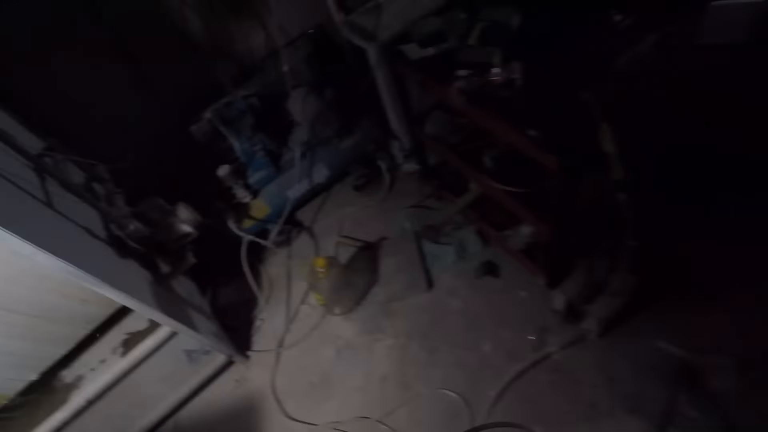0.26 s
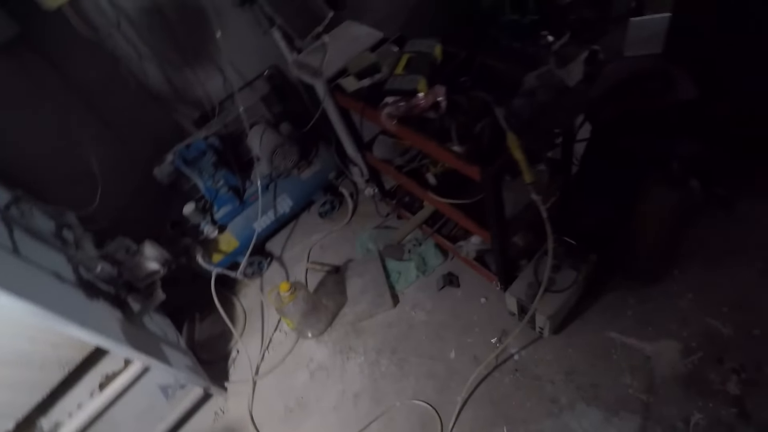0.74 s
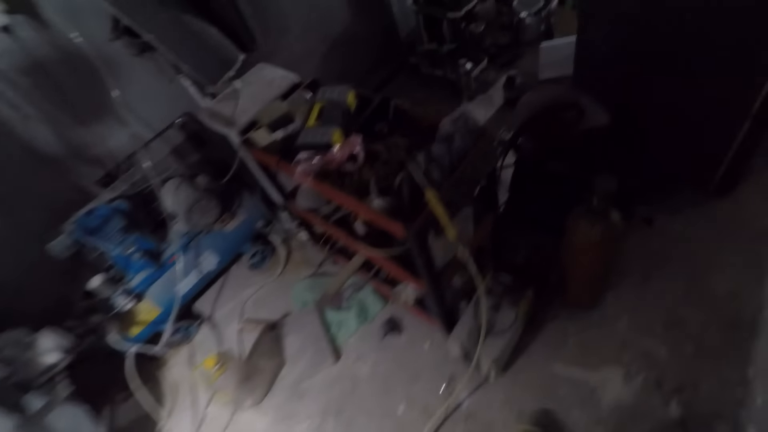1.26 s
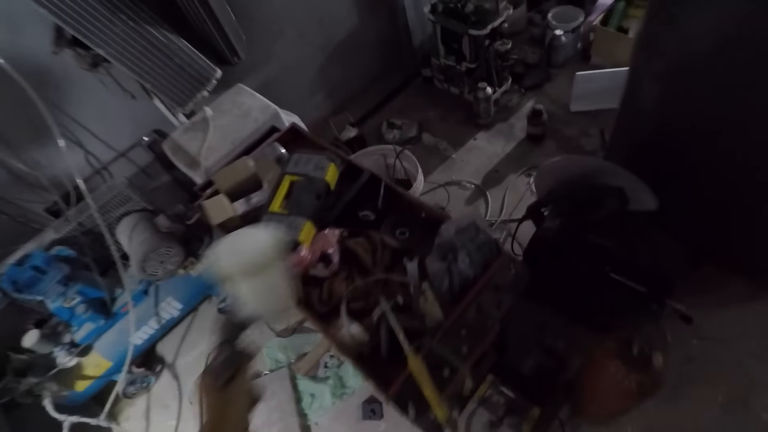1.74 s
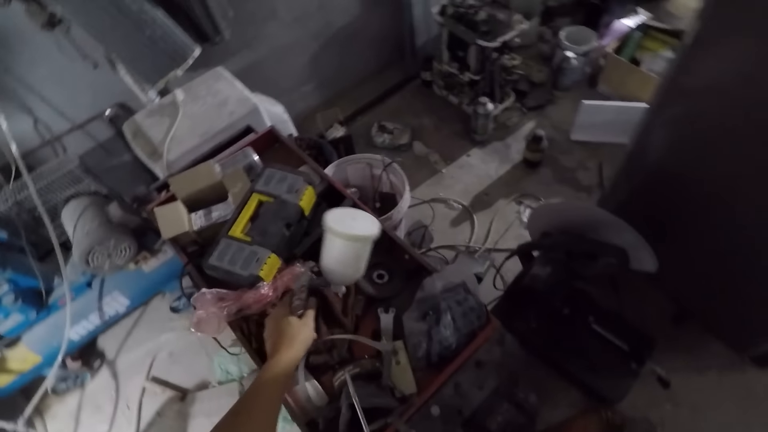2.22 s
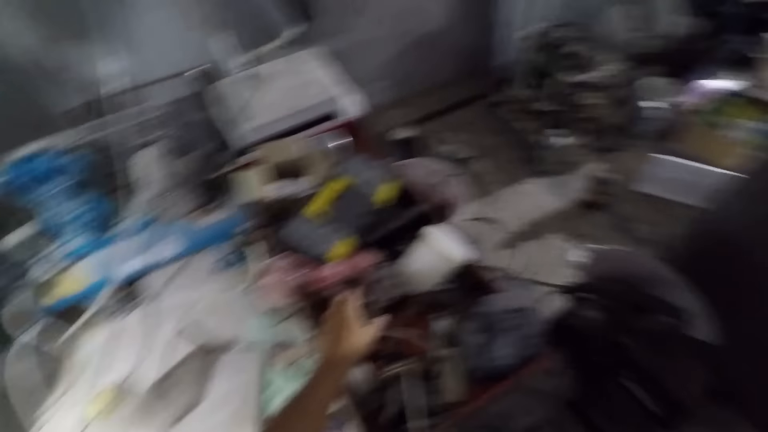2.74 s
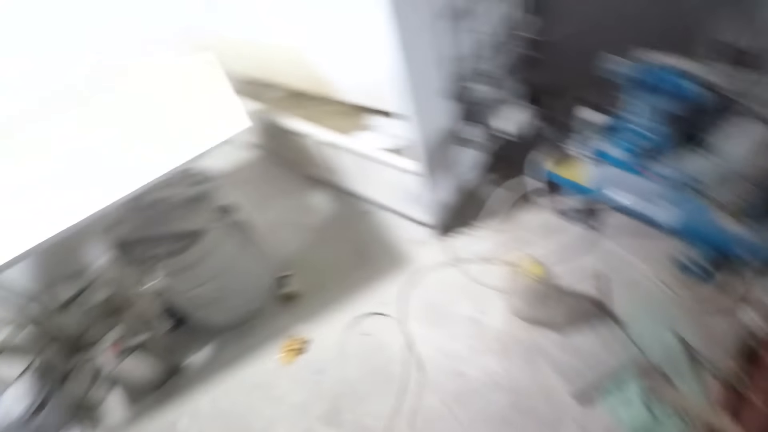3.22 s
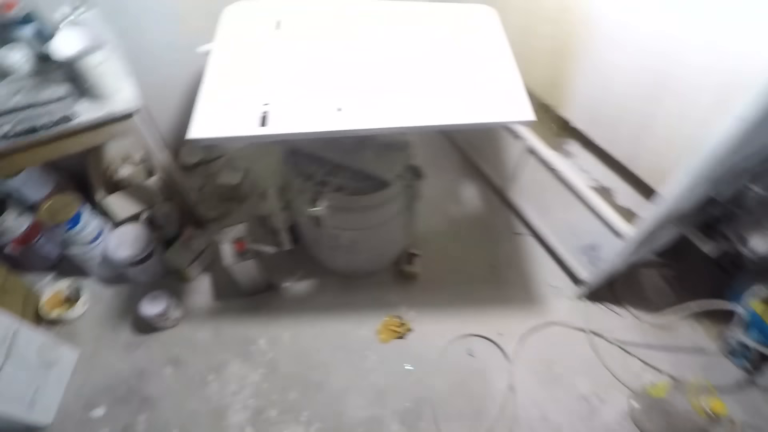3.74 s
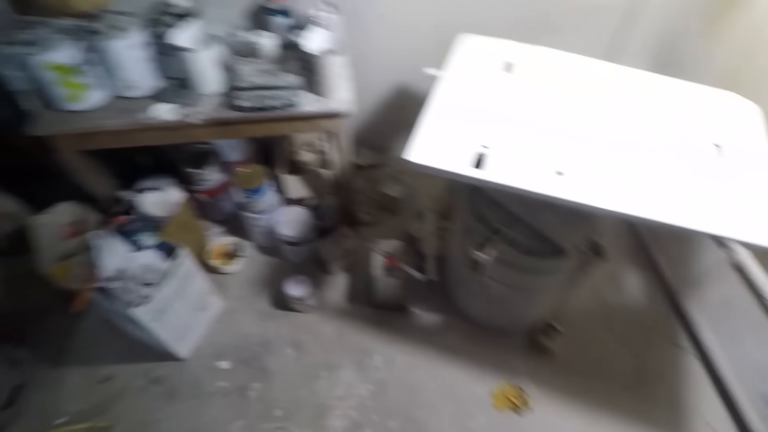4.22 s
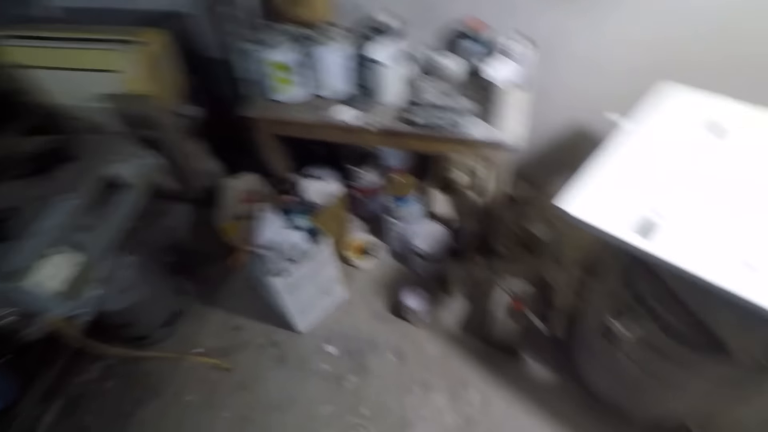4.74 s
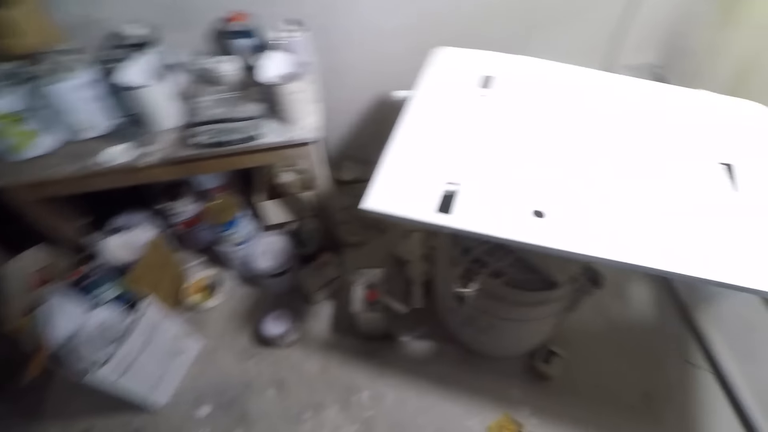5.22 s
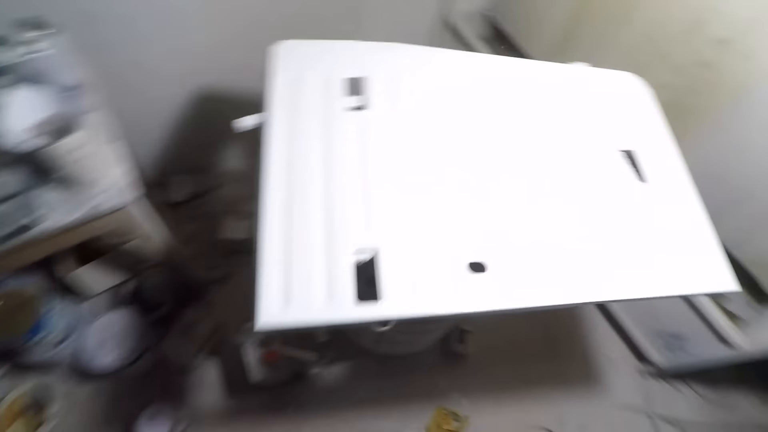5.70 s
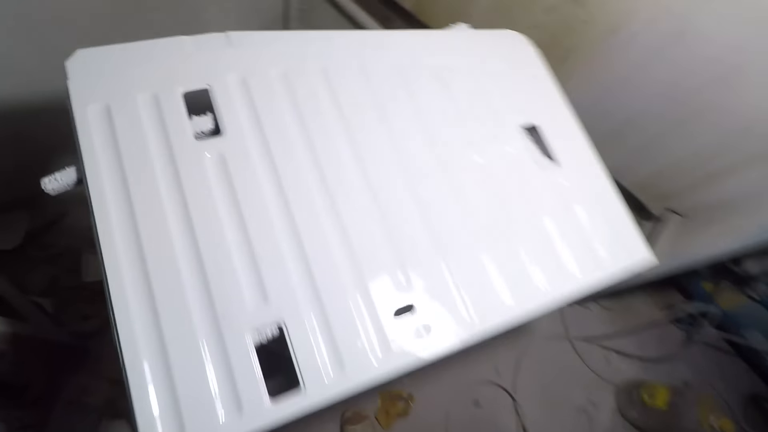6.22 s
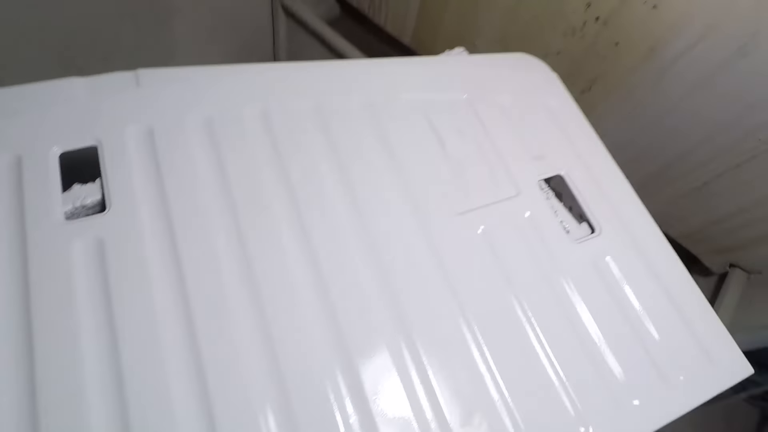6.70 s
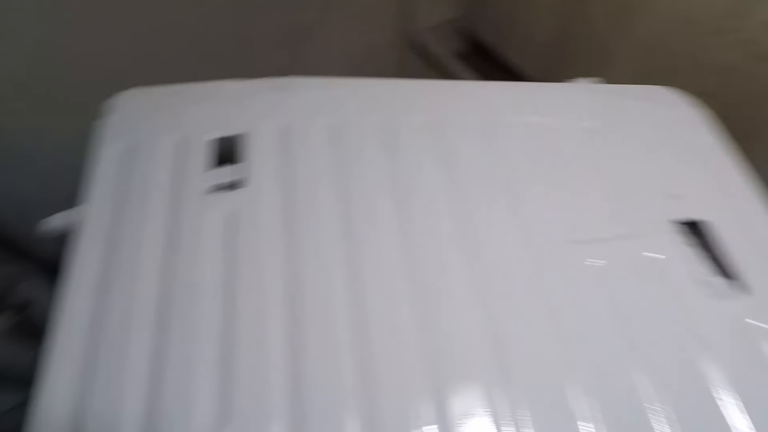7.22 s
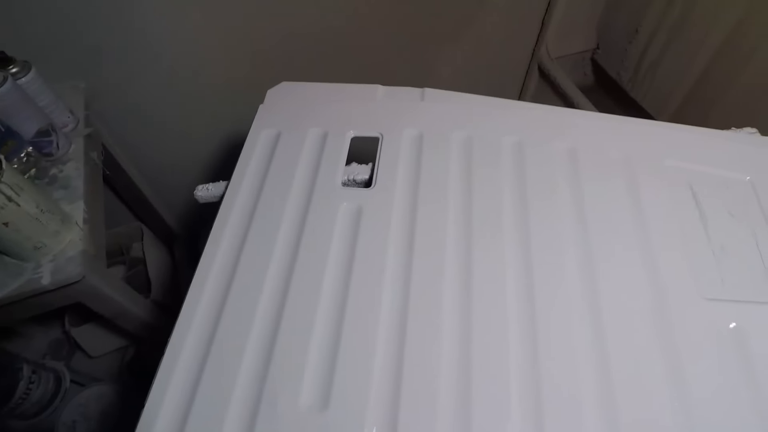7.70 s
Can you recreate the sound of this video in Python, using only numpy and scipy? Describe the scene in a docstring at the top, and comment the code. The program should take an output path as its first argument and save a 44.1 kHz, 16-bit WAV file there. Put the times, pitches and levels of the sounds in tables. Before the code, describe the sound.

Loud workshop compressor drumming about seventeen pulses a second, with valve rasp and hum; a spray gun knocks off a cart, its hose swishing.

```python
"""Air compressor in a workshop

A belt-driven piston compressor runs while someone carries a spray gun across a cluttered room, heard by a
moving microphone. The motor and pump are sums of steady tones, with low rumble noise. Once a crank turn
the intake valve flutters (a tone with an arching pitch) and the outlet valve rasps (ringing noise). Air
hisses throughout. The gun leaves a tool cart with dull knocks, and its hose swishes (shaped noise)."""
import sys
import numpy as np
from scipy import signal
from scipy.fft import rfft, irfft, next_fast_len
from scipy.io import wavfile
from scipy.ndimage import uniform_filter1d, minimum_filter1d

SR = 44100
rng = np.random.default_rng(int(sys.argv[2]) if len(sys.argv) > 2 else 0)


def file_out(sig):
    """Save sig as 16-bit WAV at sys.argv[1]."""
    # one column per channel
    cols = np.atleast_2d(sig).T
    # limit, then scale
    lim = np.clip(cols, -1, 1)
    pcm = np.round(lim * 32767).astype(np.int16)
    wavfile.write(sys.argv[1], SR, pcm)


N = 351036
T = np.arange(N) / SR  # time of every sample, in seconds

MOTOR_HZ = 46.57  # turns of the motor shaft per second
# speed of the crank: time_s, speed_turns_per_s
CRANK_SPEED = [(0, 17.2), (.6, 17.21), (1.5, 17.245), (3.5, 17.2), (5.5, 17.22), (7.96, 17.21)]


def amp(db):
    """Turns decibels into a gain."""
    return 10 ** (np.asarray(db) / 20)


def unit(x):
    """Scales a signal to an average (rms) level of 1."""
    return x / np.sqrt(np.mean(x ** 2) + 1e-20)


def curve(rows):
    """Joins the (time_s, value) points of a table by straight lines, at every sample."""
    rows = np.array(rows)
    return np.interp(T, rows[:, 0], rows[:, 1])


def bell(centre_s, width_s):
    """Rises smoothly to 1 and falls again around a moment."""
    return np.exp(-.5 * ((T - centre_s) / width_s) ** 2)


def drift(rate):
    """Random wavering of rms 1: the sum of 20 sines with speeds drawn from 0 to rate, in Hz."""
    t = T[::256]  # coarse time steps, joined by straight lines below
    wavering = sum(np.sin(2 * np.pi * (rate * f * t + rng.random())) for f in rng.random(20))
    return np.interp(T, t, unit(wavering))


def shaped(x, gain):
    """Filters x by a gain that is a function of frequency."""
    size = next_fast_len(N + 8192)  # spare room for the filter's tail
    hz = np.fft.rfftfreq(size, 1 / SR) + 1  # the 1 keeps the logarithm of frequency finite
    return irfft(rfft(x, size) * gain(hz), size)[:N]


def resonance(x, hz, width_hz):
    """One resonance, with a gain of 1 at its peak."""
    return shaped(x, lambda f: 1 / (1 + 2j * (f - hz) / width_hz))


def noise(colour):
    """Noise of rms 1 whose spectrum follows a table of (frequency_hz, relative_level_db)."""
    hz, db = np.transpose(colour)
    return unit(shaped(rng.standard_normal(N), lambda f: amp(np.interp(np.log(f), np.log(hz), db))))


def line(turns, wander):
    """A tone whose height and phase wander as the microphone crosses the room's standing waves."""
    path = (1 + wander * (drift(1.195) + 1j * drift(1.26))) / np.sqrt(1 + 2 * wander ** 2)
    return np.sqrt(2) * (path * np.exp(2j * np.pi * (turns + rng.random()))).real


def blows(rows):
    """Loudness of blows that rise quickly and die away: (start_s, level_db, rise_s, fall_by_60_db_s)."""
    total = 0
    for start, db, rise, t60 in rows:
        decay_db = 60 * np.maximum(T - start - rise, 0) / t60
        total = total + amp(db - decay_db) * np.clip((T - start) / rise, 0, 1)
    return total


def crank():
    """Turns made by the crank; whole numbers fall in the middle of the suction stroke."""
    return .44 + np.cumsum(curve(CRANK_SPEED)) / SR


def offset(turns, centre):
    """Distance in turns from the nearest pass of a crank angle."""
    return (turns - centre + .5) % 1 - .5


def opening(turns, centre, span, edge):
    """A valve that is open for a span of each turn, with soft edges (all in turns)."""
    return .5 + .5 * np.tanh((span / 2 - abs(offset(turns, centre))) / edge)


def hose():
    """Each drag of the hose over the floor is a bright swish that swells, holds and dies away."""
    # pulls on the hose: start_s, length_s, level_db, rise_s
    pulls = [(0.118, 0.086, -41, 0.049), (.75, .63, -46.5, 0.16), (1.42, 0.045, -36, .04),
             (1.88, 0.061, -42, .04), (2.076, .14, -44, 0.027), (2.545, 0.45, -40, 0.23),
             (3.056, 0.17, -37.5, 0.03), (3.9, 0.87, -42, 0.045), (4.593, 0.3, -33, 0.15),
             (4.844, 0.41, -35, 0.038), (5.29, 0.32, -34.5, 0.024), (6.48, 0.36, -44.5, .1),
             (6.76, 0.19, -40, 0.16), (7.32, 0.21, -41.5, .07), (7.6, 0.52, -42.5, 0.12)]
    # tone colour of the swish: frequency_hz, relative_level_db
    swish_colour = [(500, -6), (1000, -6), (1900, -4), (2500, -2), (3100, 0), (3700, -2), (4300, -7),
                    (5300, -6), (6000, -10), (7000, -20.5), (9000, -22), (11300, -39.5), (12300, -22),
                    (15000, -32)]
    fall_by_60_db_s = 1
    swells = []
    for start, length, db, rise in pulls:
        decay_db = 60 * np.maximum(T - start - length, 0) / fall_by_60_db_s
        swells.append(np.clip((T - start) / rise, 0, 1) * amp(db - decay_db))
    loudest = np.max(swells, axis=0)
    return loudest * amp(0.98 * drift(30)) * noise(swish_colour)


def handling():
    """Dull knocks and grainy scrapes of noise as the gun and its hose come off the cart."""
    # knocks of the gun on the cart: start_s, level_db, rise_s, fall_by_60_db_s
    knock_rows = [(1.44, -26, .02, .4), (1.88, -12, .012, .33), (1.945, -18, .012, .4),
                  (2.09, -17.5, .008, .45), (2.2, -25, .015, .45)]
    # the gun scrapes on the tools round it: start_s, level_db, rise_s, fall_by_60_db_s
    scrape_rows = [(1.49, -40, .02, .3), (1.89, -35, .02, .35), (1.945, -33, .015, .3),
                   (2.09, -35, .008, .2), (2.2, -35.5, .008, .17)]
    # tone colours of both: frequency_hz, relative_level_db
    knock_colour = [(60, -4.5), (200, -6), (300, 3), (410, -0.5), (520, -6.5), (680, -13), (850, -24.5),
                    (1250, -27), (1800, -35), (5000, -35), (9000, -68), (15000, -55)]
    scrape_colour = [(400, -14), (650, 1), (900, -0.5), (1250, -8), (1600, -11.5), (2400, -22), (6000, -28),
                     (12000, -44)]
    knocks = blows(knock_rows) * noise(knock_colour)
    grain = amp(2 * drift(150))
    scrapes = blows(scrape_rows) * grain * noise(scrape_colour)
    return knocks + scrapes


def air(turns):
    """An even hiss of noise, with a thin, very high band of hiss near 12 kHz that pulses with the suction."""
    # tone colours of the hiss and of its high band: frequency_hz, relative_level_db
    hiss_colour = [(400, -9.5), (800, 1.5), (1300, 1.5), (1950, -1.5), (2450, -1.5), (3200, -2),
                   (4200, -5.5), (5300, -8), (6000, -11.5), (7000, -19.5), (8800, -19.5), (10300, -24),
                   (11300, -34.5), (15000, -30)]
    high_hiss_colour = [(9500, -41), (11400, -21), (12100, 4), (12700, -1.5), (13250, -2), (13900, -8.5),
                        (15000, -15)]
    # level of the high band: time_s, level_db
    high_hiss_level = [(0, -60.5), (2.6, -58.5), (3.7, -57), (5.3, -59), (7.96, -60)]
    # strokes on which the high band is louder: start_s, added_level_db, rise_s, fall_by_60_db_s
    brighter_strokes = [(0, -57, .02, .35), (2.91, -56, 0.018, .4)]
    hiss = amp(-41.5 + 0.88 * drift(120)) * noise(hiss_colour)
    pulse_db = 4 * opening(turns, centre=.05, span=.36, edge=.06) * (1 + .35 * drift(8))
    high_hiss = unit(amp(pulse_db) * noise(high_hiss_colour))
    return hiss + (amp(curve(high_hiss_level)) + blows(brighter_strokes)) * high_hiss


def motor(near_db, corner):
    """The unbalanced shaft drones, with overtones, mains hum and a faint high whine that grows a little close by."""
    # overtones of the shaft: multiple_of_shaft_speed, level_db
    overtone_rows = [(3, -38.5), (4, -39.5), (6, -41), (7, -42.5), (8, -44.5), (9, -45.5), (10, -29.5),
                     (11, -39), (20, -61)]
    # level of the tone at twice the shaft speed: time_s, level_db
    second_level = [(0, -38), (1.1, -38), (1.8, -29), (3, -26), (3.9, -44), (5.3, -40), (6.9, -26.5),
                    (7.96, -29)]
    # level of the mains hum: time_s, level_db
    hum_level = [(0, -47), (.9, -33), (2.7, -33.5), (4.2, -49), (5.5, -47), (7.96, -36.5)]
    shaft = MOTOR_HZ * T
    drone = amp(-10 - 2 * corner) * line(shaft, wander=.006)
    overtones = sum(amp(db) * line(k * shaft, wander=0.18) for k, db in overtone_rows)
    second = amp(curve(second_level)) * line(2 * shaft, wander=.1)
    fifth = amp(-30 - 8.5 * corner) * line(5 * shaft, wander=.15)
    hum = amp(curve(hum_level)) * line(100 * T, wander=.15)
    # fan whine, with one brief swell
    whine_db = -60 + 1.1 * near_db + 5 * bell(.85, 0.19)
    whine = amp(whine_db) * line(4743 * T + 0.21 * drift(25), wander=0.14)
    return drone + overtones + second + fifth + hum + whine


def thin_tones(turns, near_db):
    """Just above the throb, a pump tone is heard close by; a motor tone takes over in the middle of the room."""
    of_pump = line(37 * turns, wander=.1)
    of_motor = line(15 * MOTOR_HZ * T, wander=.1)
    motor_db = -42 - 11 * (1 - bell(4.7, 0.99))
    return amp(-48.5 + 3.3 * near_db) * of_pump + amp(motor_db) * of_motor


def pump(turns, near_db):
    """Pump and tank shake at multiples of the crank speed and rumble, more strongly close by."""
    # shaking at middle distance (near_db = 0): multiple_of_crank_speed, level_db
    shaking = [(2, -34.5), (3, -46.5), (4, -37.5), (6, -33), (7, -36.5), (8, -39.5), (9, -35.5), (11, -36),
               (13, -38), (14, -41.5), (15, -39), (16, -42), (17, -44.5), (18, -42.5), (19, -41.5),
               (21, -39), (22, -49.5), (23, -46), (24, -35), (26, -36.5), (29, -29.5), (32, -29), (54, -63)]
    # tone colour of the rumble: frequency_hz, relative_level_db
    rumble_colour = [(10, -13), (40, 2.5), (100, -6), (170, -1), (270, -1), (370, -10), (480, -4),
                     (560, -7.5), (640, -11), (760, -27), (1100, -34), (3000, -58)]
    tones = 0
    for k, db in shaking:
        # the lowest tones gain most from closeness
        closeness = 1.24 + 2.0 * np.exp(-(k / 10) ** 2)
        tones = tones + amp(db + near_db * closeness) * line(k * turns, wander=0.15)
    return tones + amp(-26.0 + 0.23 * near_db) * noise(rumble_colour)


def rasp(turns, hz, width_hz, centre, span, rough):
    """A valve's chatter, partly the same on every turn and partly rushing air, rings one resonance."""
    grid = np.linspace(0, 1, 1024)
    repeated = unit(np.interp(turns % 1, grid, rng.standard_normal(len(grid))))
    gate = .28 + opening(turns, centre, span, edge=.04)  # some sound leaks through when shut

    def ring(x):
        return unit(shaped(x * gate, lambda f: 1 / (1 + 2j * (f - hz) / width_hz) ** 2))

    # rough is the share of rushing air, from 0 to 1
    return np.sqrt(1 - rough) * ring(repeated) + np.sqrt(rough) * ring(rng.standard_normal(N))


def outlet(turns, corner):
    """At the top of each compression the outlet valve rasps and the head rings; the valve plate rings as it seats."""
    # level of the cylinder head's ring: time_s, level_db
    head_level = [(0, -48), (.6, -56), (1.5, -46.5), (3, -50.5), (4.5, -43.5), (5.7, -46), (6.6, -50.5),
                  (7.96, -44)]
    valve = rasp(turns, hz=1615, width_hz=190, centre=.67, span=.28, rough=.06)
    head = rasp(turns, hz=1133, width_hz=132, centre=.72, span=0.76, rough=0.13)
    plate = rasp(turns, hz=8890, width_hz=83, centre=.02, span=.35, rough=.3)
    # weakest in the middle of the room; flares as the microphone swings past the cylinder head
    flare_db = 9 * bell(3.26, 0.2)
    valve_db = -49.5 + 4.5 * (1 - bell(5.9, 2.2)) - 4 * corner + flare_db
    return amp(valve_db) * valve + amp(curve(head_level)) * head + amp(-72.5 + 9.5 * corner) * plate


def hoots(turns):
    """Now and then the throb hoots a little higher for a stroke or two: short tones that pulse with the suction."""
    # hoots, before the suction pulse scales them: time_s, pitch_hz, level_db
    hoot_rows = [(.785, 582, -20.5), (1.285, 586, -20), (3.735, 550, -19)]
    tones = 0
    for centre_s, hz, db in hoot_rows:
        tones = tones + amp(db) * bell(centre_s, 0.02) * np.sin(2 * np.pi * (hz * T + rng.random()))
    return tones * (0.7 + 0.75 * opening(turns, centre=0, span=0.41, edge=0.06))


def muffler(x, corner_hz, order):
    """The intake filter housing passes little above its resonance and rings on briefly."""
    return signal.sosfilt(signal.butter(order, corner_hz, fs=SR, output="sos"), x)


def reed(turns, near_db):
    """The intake reed flutters in an arch of pitch that follows the piston's speed; a weaker rebound comes after."""
    # pitch at the top of the arch, in mid-stroke: time_s, pitch_hz
    arch_top = [(0, 544), (1.3, 529.6), (3.1, 553), (4.4, 531), (6.2, 533.3), (6.9, 512), (7.96, 518)]
    stroke_turns, edge_turns, lead_turns = .42, .028, .055
    sag_hz = 121  # fall in pitch from mid-stroke to either end
    angle, speed = turns + lead_turns, curve(CRANK_SPEED)
    into, after = offset(angle, 0), offset(angle, .6)

    # a third of the sag, because adding up the arching pitch gives the cycles
    sag = sag_hz * (2 * into / stroke_turns) ** 2
    cycles = (curve(arch_top) - sag / 3) * into / speed
    tone = np.cos(2 * np.pi * (cycles + 0.026 * drift(16)))
    stroke = opening(angle, 0, stroke_turns, edge_turns) * amp(-3 * into) * tone

    rebound_tone = np.cos(2 * np.pi * (497 * after / speed + .1 * drift(1.5)))
    rebound = opening(angle, centre=.6, span=.2, edge=.04) * rebound_tone
    # the rebound stands out more from afar
    both = stroke + amp(-8 - near_db) * rebound
    return muffler(both * amp(.4 * drift(8.9)), corner_hz=623.3, order=12)


def intake(turns, near_db):
    """The flutter as the room passes it on: drawn out by a resonance, at times split in two by a cancellation."""
    # strength of the room resonance against the direct flutter: time_s, level_db
    boom_level = [(0, -1), (1.1, -8), (1.7, 17), (2.8, 21), (3.3, -6), (4, -14), (7.96, -20)]
    # spells when the arch top cancels and each throb splits in two: start_s, length_s, level_change_db, fade_s
    split_rows = [(0.771, 0.61, -2, 0.017), (3.49, 0.25, -0.5, 0.0089), (5.035, 0.56, -5, 0.12),
                  (6.702, 0.48, -2.5, 0.12)]
    split, split_db = 0, 0
    for start, length, db, fade in split_rows:
        spell = .5 + .5 * np.tanh((length / 2 - abs(T - start - length / 2)) / fade)
        split = split + spell
        split_db = split_db + spell * db
    flutter = reed(turns, near_db)
    # this resonance carries the flutter between strokes
    flutter = flutter + amp(curve(boom_level)) * resonance(flutter, hz=516.5, width_hz=14)
    flutter = flutter - .9 * split * resonance(flutter, hz=512, width_hz=50)
    # evens out the power over one turn, then sets the level
    power = uniform_filter1d(flutter ** 2, size=round(SR / curve(CRANK_SPEED).mean()))
    return amp(-18 + 1.02 * near_db + split_db) * flutter / np.sqrt(abs(power) + 1e-6)


def scene():
    """Adds up all sources at one moving microphone."""
    # closeness of the microphone to the machine along the walk: time_s, closeness_db
    nearness = [(0, 2), (.8, 0.9), (2.2, 2.5), (3.2, 1.6), (4.6, -0.4), (5.8, -0.16), (6.9, -3), (7.96, -4)]
    turns, near_db = crank(), curve(nearness)
    # in the corner by the cart, standing waves favour some tones and cancel others
    corner = bell(centre_s=2.25, width_s=.6)
    body = motor(near_db, corner) + pump(turns, near_db) + thin_tones(turns, near_db)
    valves = intake(turns, near_db) + hoots(turns) + outlet(turns, corner)
    return (body + valves + air(turns) + hose() + handling())[None]


def record(dry):
    """A fast limiter holds the peaks down; then a low-pass filter sets the recorder's band limit."""
    ceiling, window_samples, edge_hz = .92, 601, 15250
    room_left = np.minimum(1, ceiling / (abs(dry) + 1e-9))
    lowest = minimum_filter1d(room_left, size=window_samples)
    gain = uniform_filter1d(lowest, size=window_samples)
    low_pass = signal.firwin(511, edge_hz, window=("kaiser", 9), fs=SR)
    return signal.oaconvolve(dry * gain, low_pass[None], "same")


dry = scene()
out = record(dry)
file_out(out)
```